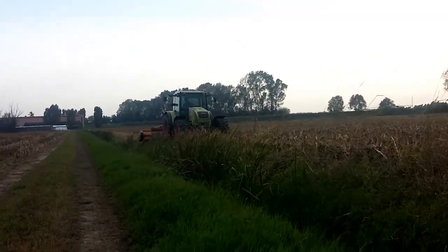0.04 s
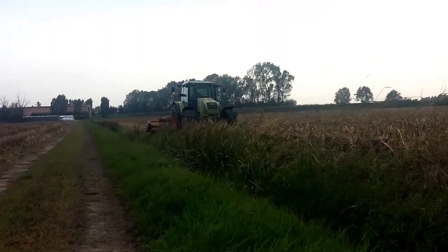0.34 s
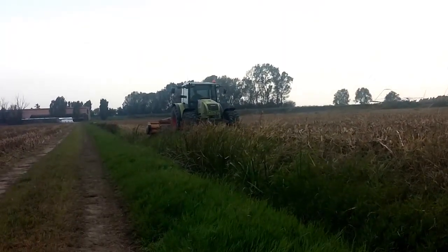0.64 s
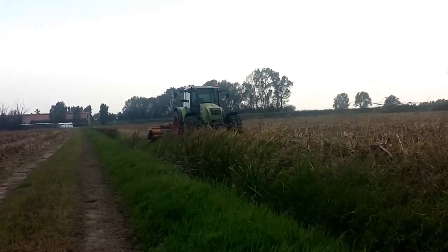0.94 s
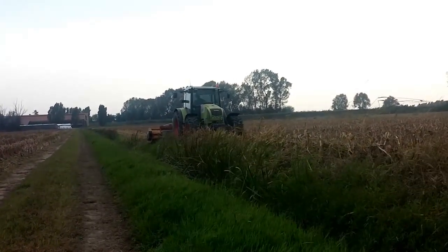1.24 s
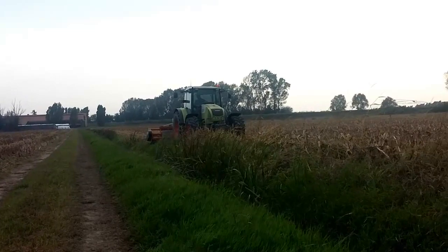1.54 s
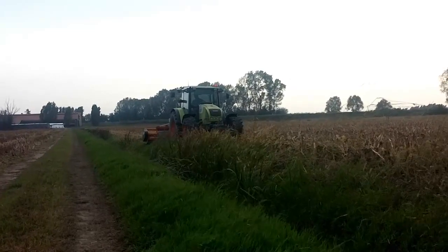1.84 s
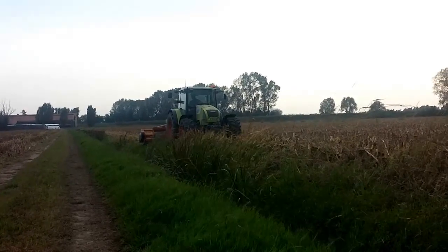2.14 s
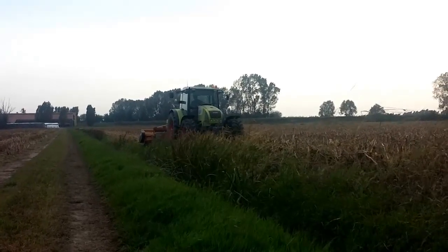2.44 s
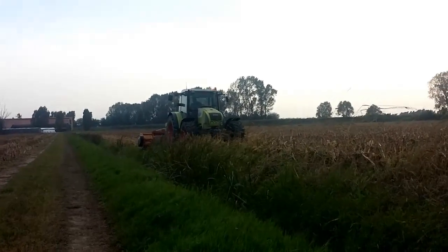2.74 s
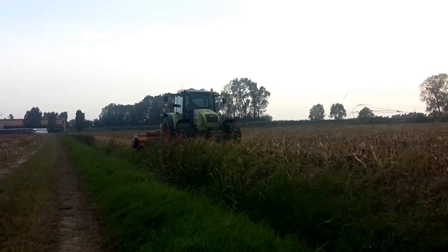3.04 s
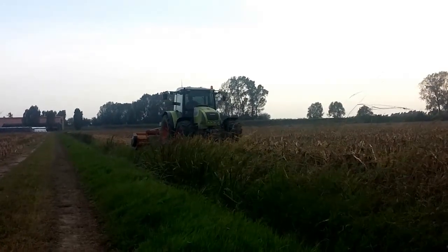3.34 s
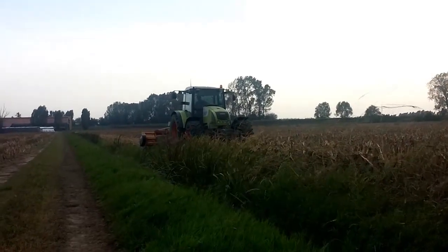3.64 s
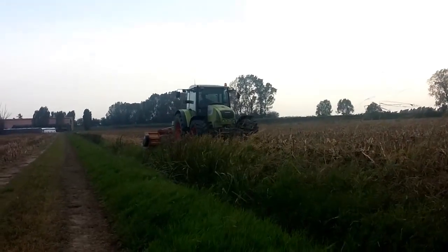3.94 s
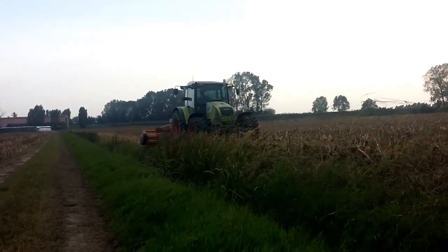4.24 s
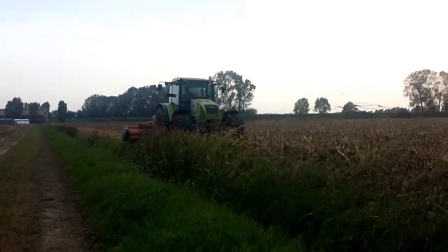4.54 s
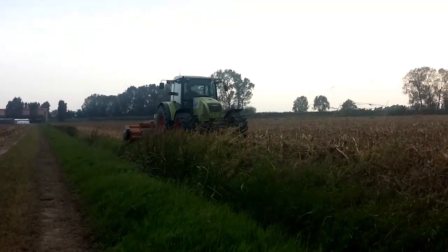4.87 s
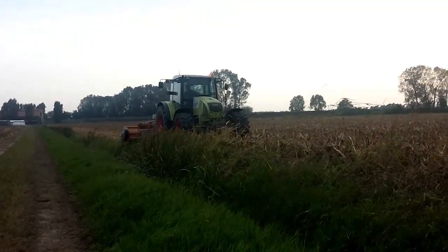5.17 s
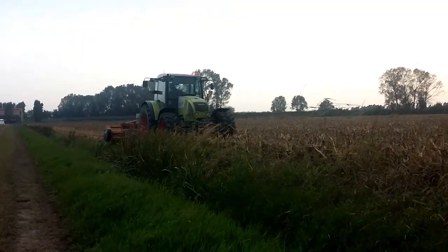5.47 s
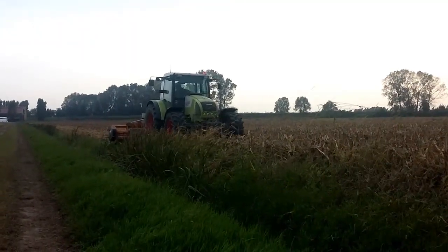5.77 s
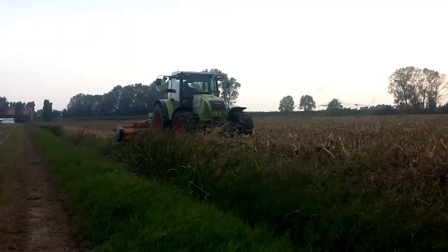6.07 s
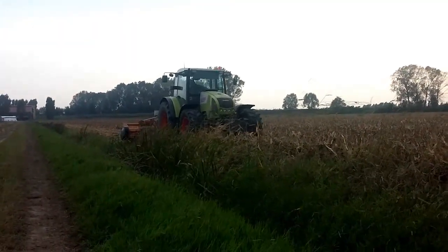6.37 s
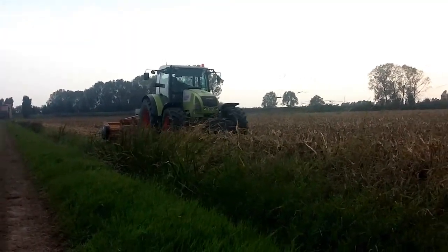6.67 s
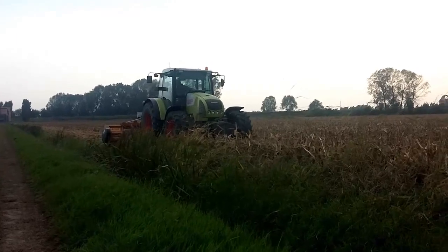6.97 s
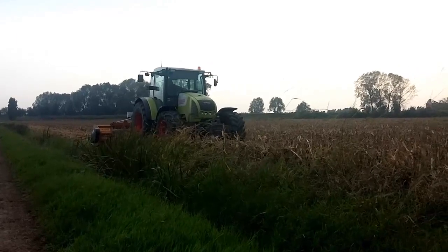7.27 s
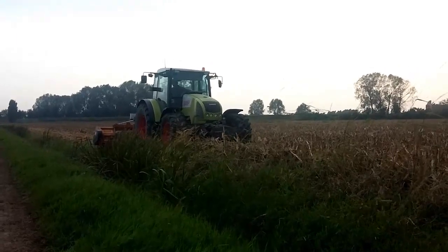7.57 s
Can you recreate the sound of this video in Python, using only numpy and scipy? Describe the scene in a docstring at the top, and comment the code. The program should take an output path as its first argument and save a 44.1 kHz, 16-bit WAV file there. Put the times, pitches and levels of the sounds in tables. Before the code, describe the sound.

Wind buffets the microphone in an open field, with uneven rumble, thumps, crackle and dry snaps. A tractor pulling a mulcher through dry stalks comes through in two short surges, a diesel drone with a thin whine and a rushing roar, the second one stronger. Between them the machine sinks to a faint hiss. Choppy gusts and snaps continue to the end.

```python
"""A tractor pulls a flail mulcher through dry stalks, heard across a windy field.
Periodic firing gives the diesel a harmonic drone, and gears and rotor add whines. The mulcher radiates
broadband noise: a roar from the hood and a hiss from the stalks, combed by a ground reflection.
Drone, whine and roar surge up twice with strong gusts and sink to a thin hiss in the lulls.
Turbulent gusts buffet and crackle on the microphone, with rumble, thumps, snaps and swishes."""
import sys
import numpy as np
from scipy import signal
from scipy.fft import rfft, irfft, next_fast_len
from scipy.io import wavfile
from scipy.ndimage import uniform_filter1d

SR = 44100
rng = np.random.default_rng(int(sys.argv[2]) if len(sys.argv) > 2 else 0)


def to_wav(sig):
    """Store sig (one row per channel, or 1-D mono) as 16-bit WAV at the path in sys.argv[1].

    Samples outside -1..1 are clipped; the rate is SR.
    """
    pcm = np.clip(np.atleast_2d(sig), -1, 1) * 32767
    pcm = np.round(pcm).astype(np.int16)
    wavfile.write(sys.argv[1], SR, pcm.T)  # frames by channels


N = 344421
TIME = np.arange(N) / SR
NEARNESS = np.clip((TIME - 2.4) / 3.17, 0, 1)  # of the machine: 0 far, 1 near
FFT_SIZE = next_fast_len(N, real=True)
BIN_HZ = np.fft.rfftfreq(FFT_SIZE, 1 / SR)

# Levels are relative: each source applies its own gain.
# how much of the machine's sound comes through: time_s, share (0-1)
SURGE_CURVE = [(1.3, 0), (1.67, 0.47), (2.26, 0.47), (2.36, 0.02), (4.9, 0.07), (5.2, 0.8), (5.45, 0.94),
               (6.05, 0.34), (6.2, 0)]
# first harmonics of the firing rate: level_db
EXHAUST_HARMONICS = [-24, -28.5, -36]
# tones of gears and rotor: pitch_hz, level_db
GEAR_TONES = [(624.5, -36), (1793, -41.5)]
# clumps of stalks in the flails: start_s, length_s, level_db
STALK_CLUMPS = [(1.21, 0.013, -30), (2.44, 0.013, -37), (3.752, .02, -33.5), (3.885, 0.0068, -34.5),
                (5.785, 0.0059, -32.5), (5.828, 0.011, -34.5), (5.872, 0.015, -30.5), (7.1, 0.01, -44)]
# hiss between gusts: time_s, level_db
HISS_FLOOR = [(0, -48), (.68, -49), (.87, -58.5), (1.12, -47), (1.3, -52.5), (4.05, -48), (4.6, -52.5),
              (7.8, -51)]
# gusts: start_s, length_s, buffet_db, rumble_db, crackle_and_roar_db, hiss_db
WIND_GUSTS = [(0, 0.13, -32, -45.5, -37.5, -54), (0.29, 0.046, -34.5, -63, -36.5, -48.5),
              (0.471, 0.059, -47, -64.5, -40.5, -50), (0.644, 0.065, -50.5, -82, -40.5, -51),
              (0.773, 0.02, -59, -78, -46.5, -54), (0.91, 0.018, -59.5, -63, -49.5, -56),
              (1.221, 0.031, -24.5, -25, -35, -44), (1.332, 0.016, -31, -40, -40.5, -52),
              (1.395, 0.047, -26, -27.5, -37, -45), (1.425, 0.12, -21, -24.5, -37, -40.5),
              (1.557, 0.065, -24.5, -32, -35.5, -35), (1.639, 0.11, -25.5, -20.5, -27.5, -34.5),
              (1.763, 0.1, -23.5, -24, -31.5, -38), (1.905, 0.15, -23.5, -23, -34, -32.5),
              (2.091, 0.17, -20, -18, -30, -33.5), (2.31, 0.05, -23.5, -21, -36.5, -41.5),
              (2.437, 0.011, -16, -21.5, -24, -33), (2.503, 0.0062, -22.5, -37, -29.5, -49),
              (2.578, 0.063, -28.5, -33, -37, -45), (2.728, 0.052, -28, -25, -32.5, -52),
              (2.855, 0.085, -33.5, -36, -42, -52), (2.929, 0.13, -26, -31, -40.5, -47.5),
              (3.103, 0.025, -26.5, -37, -36.5, -57), (3.139, 0.031, -22, -28.5, -35, -52),
              (3.283, 0.027, -22.5, -23, -30.5, -49), (3.34, 0.012, -23, -28, -31.5, -40.5),
              (3.395, 0.024, -27.5, -35, -31.5, -44.5), (3.501, 0.038, -26, -31, -33, -41.5),
              (3.599, 0.083, -22, -20, -34.5, -53), (3.747, 0.044, -18.5, -20.5, -21, -38.5),
              (3.856, 0.11, -22.5, -28.5, -30, -38), (4.015, 0.091, -54, -72, -43.5, -46.5),
              (4.17, 0.173, -38.5, -46.5, -44, -68), (4.404, 0.0073, -30, -31.5, -42, -44.5),
              (4.573, 0.078, -36.5, -40.5, -45, -61), (4.764, 0.17, -24.5, -26, -34.5, -45),
              (4.916, 0.073, -19.5, -20.5, -32.5, -42), (5.064, 0.026, -17, -24, -31.5, -45),
              (5.156, 0.55, -20.5, -19.5, -30.5, -36.5), (5.324, 0.21, -43, -33, -29.5, -39.5),
              (5.726, 0.034, -31, -23, -54, -47), (5.778, 0.22, -23.5, -20.5, -36, -40.5),
              (5.964, 0.1, -19, -27, -31, -40.5), (6.083, 0.1, -25.5, -30, -48, -48),
              (6.209, 0.098, -35, -41.5, -37.5, -59), (6.373, 0.036, -34.5, -38, -43, -56),
              (6.467, 0.035, -32.5, -37.5, -34, -55), (6.645, 0.15, -28.5, -35, -42, -68),
              (6.673, 0.039, -19, -25, -34.5, -43), (7.109, 0.036, -26.5, -38, -31, -47),
              (7.267, 0.057, -28, -35.5, -36, -50.5), (7.397, 0.0084, -21, -29, -30, -59),
              (7.511, 0.011, -35.5, -37, -47, -53), (7.579, 0.048, -36.5, -55, -38, -51),
              (7.677, 0.012, -26.5, -29, -35, -45), (7.727, 0.049, -27, -33, -36.5, -44)]
# single vortices at the microphone: time_s, peak_db, pitch_hz
VORTICES = [(1.248, -14.5, 398), (1.52, -11, 443), (1.589, -13, 137), (1.716, -5, 192), (1.797, -8, 365),
            (1.876, -9.5, 330), (1.951, -10, 300), (1.961, -10, 110), (2.02, -9.5, 150), (2.169, -14, 95),
            (2.184, -8.5, 190), (2.23, -4.5, 179), (2.246, -4, 148), (2.748, -18.5, 100), (3.305, -16, 194),
            (3.785, -9.5, 280), (3.863, -11.5, 300), (5.184, -6.5, 145), (5.46, -12, 145), (5.548, -8, 145)]
# dry snaps: start_s, level_db
DRY_SNAPS = [(0.141, -20), (0.429, -35), (0.654, -24.5), (0.6818, -37), (1.2426, -17.5), (2.4546, -12),
             (2.693, -26), (2.756, -32), (3.302, -26), (3.71, -19.5), (3.952, -18.5), (4.415, -24.5),
             (4.6576, -21), (5.08, -26), (5.974, -13), (6.1758, -20.5), (7.0075, -22.5), (7.1382, -17),
             (7.318, -25), (7.402, -22), (7.522, -16), (7.78, -18.5)]
# gliding swishes: start_s, length_s, start_hz, end_hz, level_db
SWISH_GLIDES = [(0.336, 0.1, 1100, 2500, -42), (1.081, 0.08, 1257, 3290, -51),
                (1.207, 0.02, 5600, 5120, -33.5), (1.438, 0.067, 1340, 1128, -28.5)]

# noise spectra of the machine: frequency_hz, density_db
HOOD_SPECTRUM = [(250, -27), (520, -5), (720, 11.5), (900, -4.5), (1170, 0.5), (1600, -5), (1820, -4.5),
                 (2300, -4), (2750, -24), (3450, -9), (9000, -56)]
FAR_HISS_SPECTRUM = [(600, -20), (1590, -1), (2800, 2), (3890, 2), (5600, -1), (7160, 4), (9720, -10),
                     (13200, -20.5), (16000, -20)]
NEAR_HISS_SPECTRUM = [(1590, -37), (2700, -2), (3500, -0.5), (3920, 3), (5360, -4), (5770, -5), (7320, -8),
                      (10400, -22.5), (16000, -27.5)]
STEADY_HISS_SPECTRUM = [(1500, -25), (6500, -7.5), (8700, 2), (10500, -11), (16000, -11)]
# noise spectra of the wind: frequency_hz, density_db
BUFFET_SPECTRUM = [(40, -46), (110, -8), (200, 0), (400, -2), (700, -5), (880, -9.5), (1200, -15),
                   (2500, -32), (8000, -77)]
RUMBLE_SPECTRUM = [(20, -27), (48, -19.5), (66, -7), (100, -4), (150, -7.5), (210, -11), (320, -24),
                   (2000, -64.5)]
CRACKLE_SPECTRUM = [(150, -45), (600, 3.5), (1050, 7.5), (1400, 5), (1900, 2), (2400, -1), (2950, -9.5),
                    (3350, -19), (5000, -13), (12000, -37)]
SNAP_SPECTRUM = [(200, -18), (900, 4.5), (2300, 2.5), (3300, -10), (5000, -14), (12000, -35)]

# floors between gusts: far_db, near_db
BUFFET_LULL, RUMBLE_LULL, CRACKLE_LULL = (-76, -55.5), (-79, -76), (-53.5, -43)
# envelopes of a gust or clump: rise_db_per_s, arch_db, fall_db_per_s
BUFFET_SHAPE, RUMBLE_SHAPE, CRACKLE_SHAPE = (1260, 0.28, 260), (790, 1.7, 330), (570, 2.8, 286)
HISS_SHAPE, CLUMP_SHAPE = (350, 0.93, 500), (1500, 0.86, 1100)
# shares of the flow's quick fluctuations: buffet, rumble, crackle, hiss
LUMP_SHARES = (0.87, 0.94, 0.8, 0.59)


def tractor(buffet_db, surge, firing_hz=75.1, usual_gust_db=-30):
    """Periodic firing yields harmonics; jitter of the loaded rotor broadens the gear tones."""
    shaft_s = np.cumsum(1 + 0.0022 * wander(5.73)) / SR
    drone = sum(gain_of(db) * np.sin(2 * np.pi * (order * firing_hz * shaft_s + rng.random()))
                for order, db in enumerate(EXHAUST_HARMONICS, 1))
    rotor_s = shaft_s + np.cumsum(0.01 * wander(60)) / SR
    whine = sum(gain_of(db + 3.2 * wander(37)) * np.sin(2 * np.pi * hz * rotor_s)
                for hz, db in GEAR_TONES)
    return surge * gain_of(0.5 * (buffet_db - usual_gust_db)) * (drone + whine)


def roar_and_crackle(level_db, surge, eddies, faint_db=-51):
    """Broadband noise: the wind's dry crackle gives way to the hood's louder roar in the surges."""
    hood = turbulence(HOOD_SPECTRUM, 0.29 * eddies, patch_db=3.0, window=1300)
    roar = hood - 0.5 * (1 - NEARNESS) * butterworth(hood, 3, 920)  # deeper as it nears
    flutter_db = 3.4 * eddies + 2.6 * wander(380)
    flutter = turbulence(CRACKLE_SPECTRUM, flutter_db, patch_db=5.0, window=1300)
    crackle = gain_of(-5.0) * flutter + gain_of(-6.0) * ticks()
    faintness = 1 / (1 + gain_of(2 * (level_db - faint_db)))
    crackle -= faintness * butterworth(crackle, 3, 1250)  # thinner when faint
    blend = np.sqrt(surge) * gain_of(5.5) * roar + np.sqrt(1 - surge) * crackle
    return gain_of(level_db - 1.33) * blend


def stalk_hiss(level_db, eddies, surge, notch_hz=2900, notch_width_hz=600):
    """Shredding radiates noise that swells with each clump; a spectral notch hollows it in surges."""
    flicker_db = (1 - surge / 2) * (1.8 * eddies + 3.0 * wander(27) + 2.1 * wander(1700))
    far = turbulence(FAR_HISS_SPECTRUM, flicker_db, patch_db=2.5, window=1100)
    near = turbulence(NEAR_HISS_SPECTRUM, flicker_db, patch_db=2.5, window=1100)
    fizz = np.sqrt(1 - NEARNESS) * far + np.sqrt(NEARNESS) * near
    notch_band = signal.filtfilt(*signal.iirpeak(notch_hz, notch_hz / notch_width_hz, fs=SR), fizz)
    envelope = gain_of(swells(STALK_CLUMPS, CLUMP_SHAPE, level_db - 1.9))
    return envelope * (fizz - np.sqrt(surge) * notch_band)


def ground_reflection(direct, surge, delay_s=0.00177):
    """Direct and reflected waves interfere as a comb, which glides as moving air shifts the delay."""
    reflected = np.interp(TIME - delay_s * (1 + 0.06 * wander(2)), TIME, direct)
    share = 0.4 * surge
    return (direct + share * reflected) / np.sqrt(1 + share ** 2)


def wind(buffet_db, rumble_db, eddies, hard_db=-17.0):
    """Turbulent pressure buffets the microphone port; large, slow eddies give the rumble."""
    flutter_db = 3.6 * eddies + 3.2 * wander(70)
    buffet = turbulence(BUFFET_SPECTRUM, flutter_db, patch_db=4.0, window=900)
    rumble = turbulence(RUMBLE_SPECTRUM, 2.2 * wander(54), patch_db=0.0, window=1300)
    # hard gusts shed larger eddies, so the buffeting gets duller
    hardness = 1 / (1 + gain_of(-2 * (buffet_db - hard_db)))
    buffet = (1 - hardness) * buffet + hardness * unit_rms(butterworth(buffet, 2, 520))
    return gain_of(buffet_db - 1.58) * buffet + gain_of(rumble_db - 0.23) * rumble


def vortex_thumps(cycles=0.76, sag_s=0.014):
    """A passing vortex gives equal compression and suction in a brief pulse of falling pitch."""
    out, t = np.zeros(N), np.arange(-1000, 1000) / SR
    for time_s, peak_db, pitch_hz in VORTICES:
        turns = pitch_hz * sag_s * (1 - np.exp(-t / sag_s))
        swirl = np.exp(-(t * pitch_hz / cycles) ** 2) * np.cos(2 * np.pi * turns)
        pressure = np.gradient(swirl, t) / (2 * np.pi * pitch_hz)
        add(out, time_s + t[0], gain_of(peak_db) * pressure)
    return out


def snaps(attack_s=0.0012, length_s=0.0065):
    """Broadband transients: noise that rises fast and breaks off is heard as a dry snap."""
    envelope, t = np.zeros(N), TIME[:1000]
    grain = turbulence(SNAP_SPECTRUM, 0, patch_db=2.0, window=100)
    burst = np.minimum(t / attack_s, 1) * np.exp(-(t / length_s) ** 4)
    for start_s, level_db in DRY_SNAPS:
        add(envelope, start_s, gain_of(level_db - 10.0) * burst)
    return grain * envelope


def ticks(per_second=170, spread_db=7.0, decay_s=0.00058):
    """A Poisson process of dry ticks, each an exponentially decaying noise burst of random size."""
    hits = rng.random(N) < per_second / SR
    sizes = gain_of(spread_db * np.minimum(rng.exponential(1, N), 2.7)) * hits
    envelope = signal.lfilter([1], [1, -np.exp(-1 / (decay_s * SR))], sizes)
    return unit_rms(coloured(envelope * rng.standard_normal(N), CRACKLE_SPECTRUM))


def swishes(width_hz=780):
    """Frequency translation: a fluttering noise band glides in pitch as it swells and fades."""
    out = np.zeros(N)
    band = (wander(width_hz) + 1j * wander(width_hz)) * gain_of(4.6 * wander(170))
    for start_s, length_s, start_hz, end_hz, level_db in SWISH_GLIDES:
        hz = np.geomspace(start_hz, end_hz, round(length_s * SR))
        carrier = np.exp(2j * np.pi * np.cumsum(hz) / SR)
        air = (band[round(start_s * SR):][:len(hz)] * carrier).real
        add(out, start_s, gain_of(level_db) * unit_rms(air) * signal.windows.tukey(len(hz), 0.5))
    return butterworth(out, 2, 800, "high")


def distant_hiss(level_db=-65.5):
    """Stationary noise: a smooth, high hiss from the machine, independent of the gusts."""
    return gain_of(level_db) * unit_rms(coloured(rng.standard_normal(N), STEADY_HISS_SPECTRUM))


def gust_levels(surge, lump_hz=27.3, lump_db=2.5):
    """Unsteady flow modulates buffet, rumble, crackle and hiss levels (dB), steadier in surges."""
    start_s, length_s, *strengths = np.transpose(WIND_GUSTS)
    lumps = wander(lump_hz)
    lumps_db = lump_db * (1 - surge / 2) * unit_rms(lumps - uniform_filter1d(lumps, size=2600))
    lulls = [far + (near - far) * NEARNESS for far, near in (BUFFET_LULL, RUMBLE_LULL, CRACKLE_LULL)]
    lulls.append(curve(HISS_FLOOR))
    shapes = BUFFET_SHAPE, RUMBLE_SHAPE, CRACKLE_SHAPE, HISS_SHAPE
    return [swells(np.c_[start_s, length_s, db], shape, lull, share * lumps_db)
            for db, shape, lull, share in zip(strengths, shapes, lulls, LUMP_SHARES)]


def swells(events, shape, lull_db, lumps_db=0):
    """Incoherent sounds add in power: the level in dB of rising, arching, dying events over a floor."""
    t = TIME[::32]
    start_s, length_s, event_db = np.transpose(events)[:, :, None]
    rise, arch_db, fall = shape
    age_s = t - start_s
    off_middle = 2 * np.clip(age_s / length_s, 0, 1) - 1
    held_db = event_db + arch_db * (0.5 - off_middle ** 2)
    level_db = held_db - rise * np.maximum(-age_s, 0) - fall * np.maximum(age_s - length_s, 0)
    power = np.interp(TIME, t, np.sum(gain_of(level_db) ** 2, axis=0))
    return 10 * np.log10(power * gain_of(lumps_db) ** 2 + gain_of(lull_db) ** 2)


def turbulence(spectrum, flicker_db, patch_db, window):
    """Intermittency: noise in quick, patchy bursts, its power levelled over window samples."""
    noise = coloured(patchy(rng.standard_normal(N), patch_db) * gain_of(flicker_db), spectrum)
    power = uniform_filter1d(uniform_filter1d(noise ** 2, window), window)
    return noise / np.sqrt(abs(power) + 1e-20)


def patchy(x, depth_db, bins=7, frames=6):
    """Each eddy favours its own frequencies: random patches of gain in time and frequency."""
    spectra = signal.stft(x, nperseg=512, noverlap=384)[2]
    field = uniform_filter1d(rng.standard_normal(spectra.shape), bins, axis=0)
    field = unit_rms(uniform_filter1d(field, frames, axis=1))
    return signal.istft(spectra * gain_of(depth_db * field), nperseg=512, noverlap=384)[1][:N]


def wander(rate_hz):
    """Random fluctuation of rms 1, band-limited to about rate_hz."""
    spectrum = rfft(rng.standard_normal(FFT_SIZE)) * np.exp(-(BIN_HZ / rate_hz) ** 2)
    return unit_rms(irfft(spectrum, FFT_SIZE)[:N])


def coloured(x, spectrum):
    """Zero-phase filtering by a spectrum interpolated in log frequency."""
    hz, db = np.transpose(spectrum)
    response = gain_of(np.interp(np.log(BIN_HZ + 1), np.log(hz), db))
    return irfft(rfft(x, FFT_SIZE) * response, FFT_SIZE)[:N]


def butterworth(x, order, cutoff_hz, kind="low"):
    """Maximally flat filtering, low-pass by default."""
    return signal.sosfiltfilt(signal.butter(order, cutoff_hz, kind, fs=SR, output="sos"), x)


def curve(rows):
    """Linear interpolation at every sample."""
    return np.interp(TIME, *np.transpose(rows))


def add(mix, start_s, sound):
    """Superposition of a sound on the mix."""
    part = mix[max(round(start_s * SR), 0):][:len(sound)]
    part += sound[:len(part)]


def gain_of(db):
    """Amplitude ratio of a level in decibels."""
    return 10 ** (np.asarray(db) / 20)


def unit_rms(x):
    """Normalisation to rms 1."""
    return x / np.sqrt(np.mean(x ** 2) + 1e-20)


def scene():
    """Common modulation: the machine's sound rises and falls together with the gusts and eddies of the wind."""
    surge = np.clip(curve(SURGE_CURVE), 0, 1)
    buffet_db, rumble_db, crackle_db, hiss_db = gust_levels(surge)
    eddies = unit_rms(np.tanh(0.55 * wander(176)))  # the flow flaps between attached and separated
    air = wind(buffet_db, rumble_db, eddies) + vortex_thumps() + snaps() + swishes()
    noise = roar_and_crackle(crackle_db, surge, eddies) + stalk_hiss(hiss_db, eddies, surge)
    return (tractor(buffet_db, surge) + ground_reflection(noise, surge) + air + distant_hiss())[None]


def record(dry):
    """Soft saturation rounds the largest swings; a low-pass filter limits the bandwidth."""
    ceiling, edge_hz = 0.72, 15800
    rounded = dry / (1 + (dry / ceiling) ** 4) ** 0.25
    lowpass = signal.firwin(511, edge_hz, window=("kaiser", 9), fs=SR)
    return signal.oaconvolve(rounded, lowpass[None], "same")


dry = scene()
out = record(dry)
to_wav(out)
```